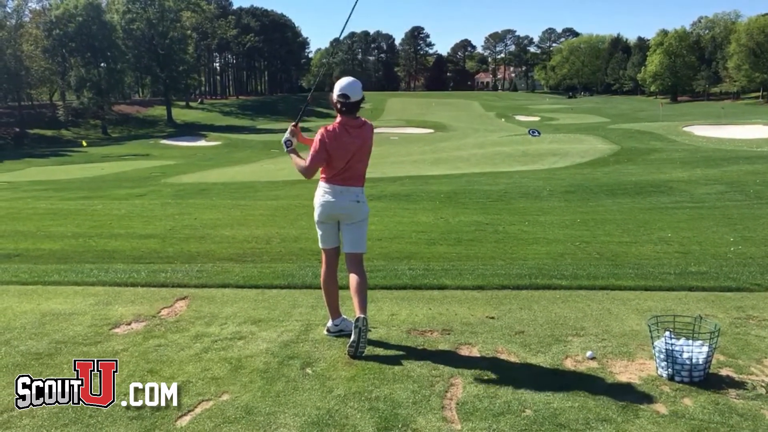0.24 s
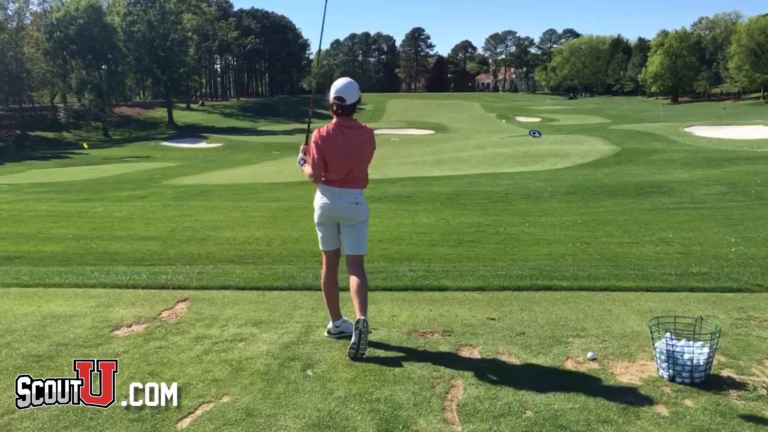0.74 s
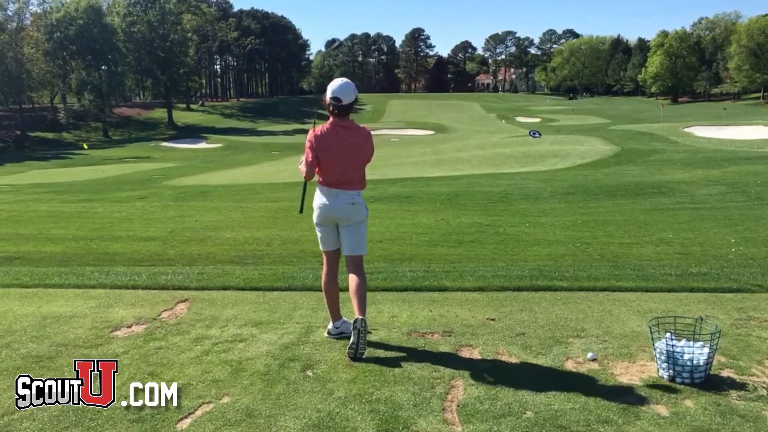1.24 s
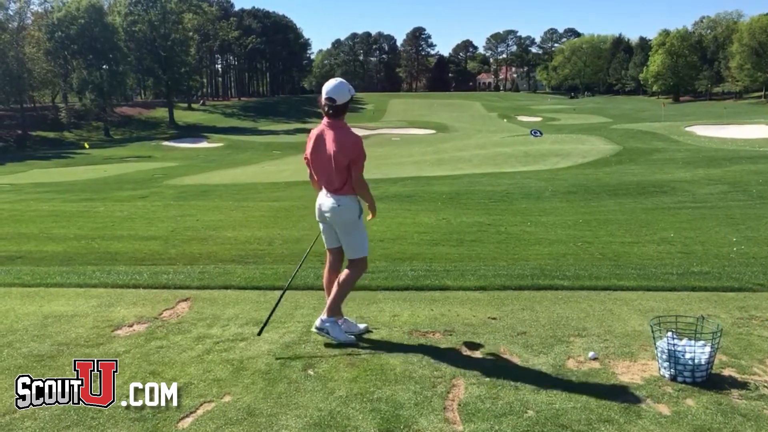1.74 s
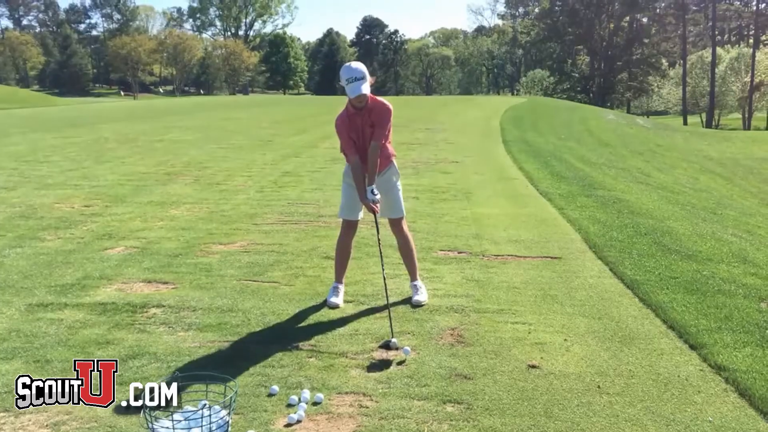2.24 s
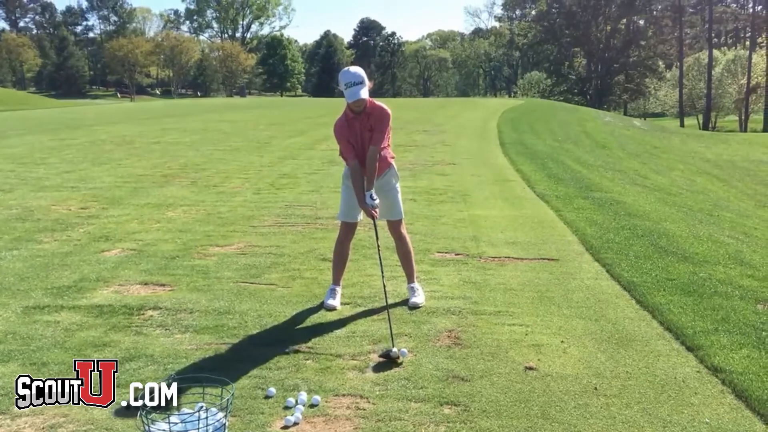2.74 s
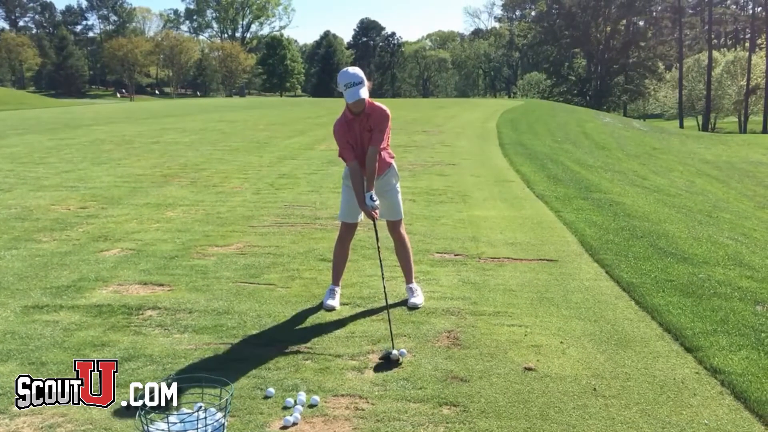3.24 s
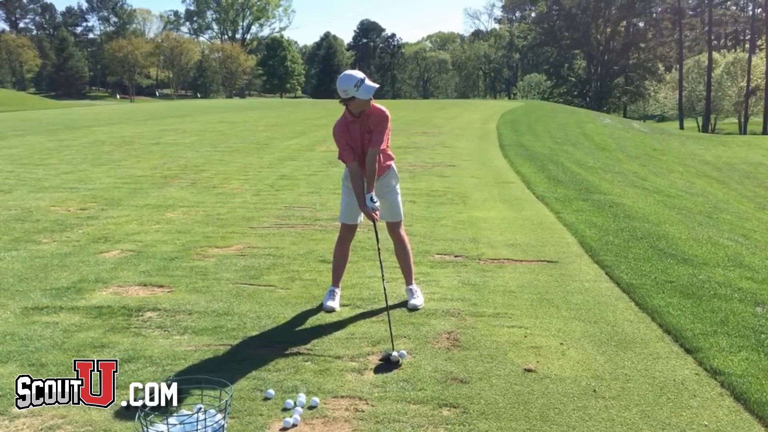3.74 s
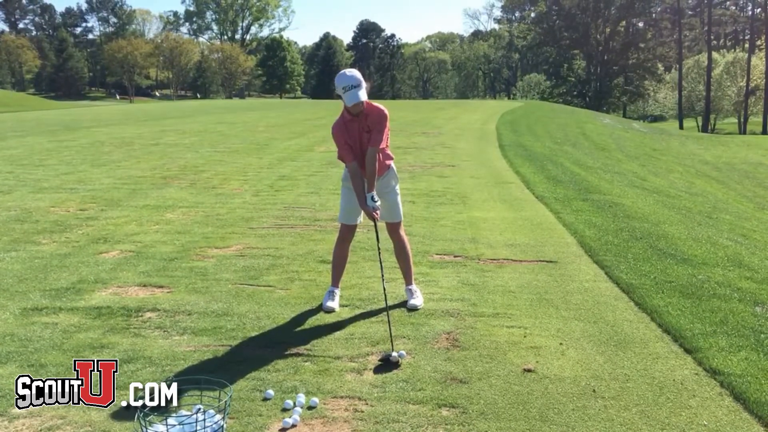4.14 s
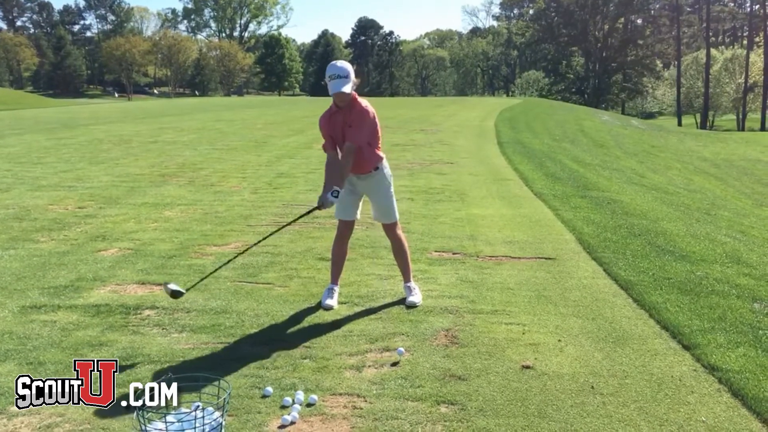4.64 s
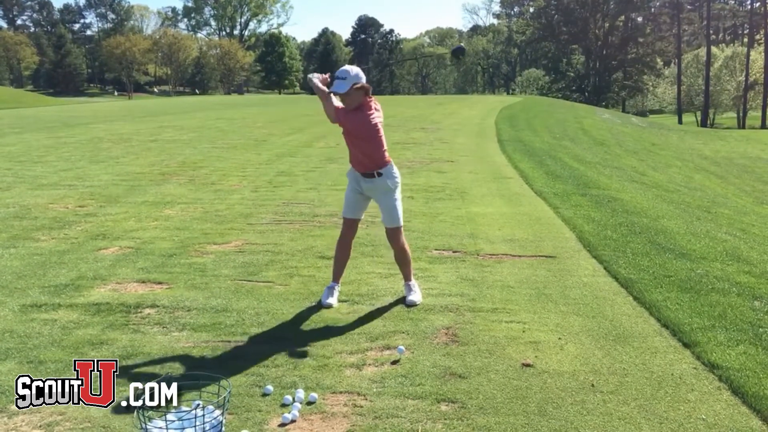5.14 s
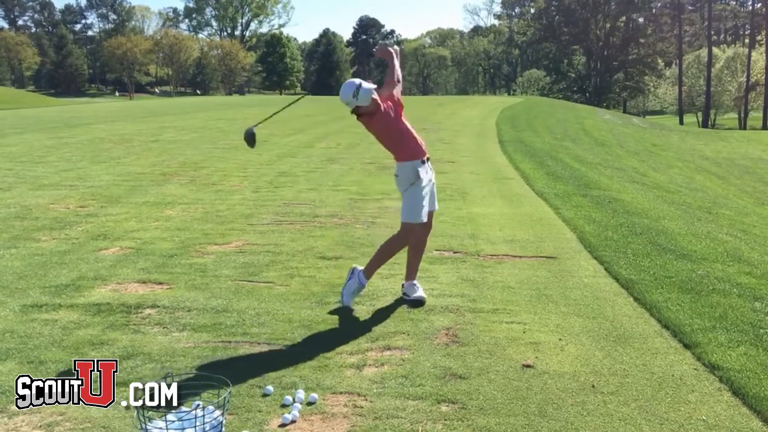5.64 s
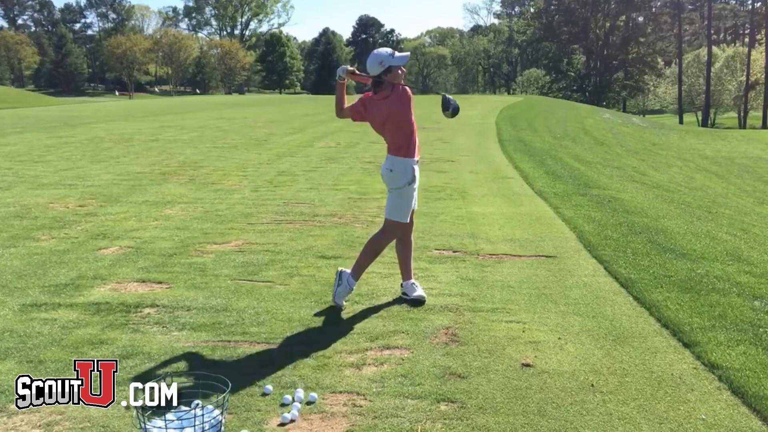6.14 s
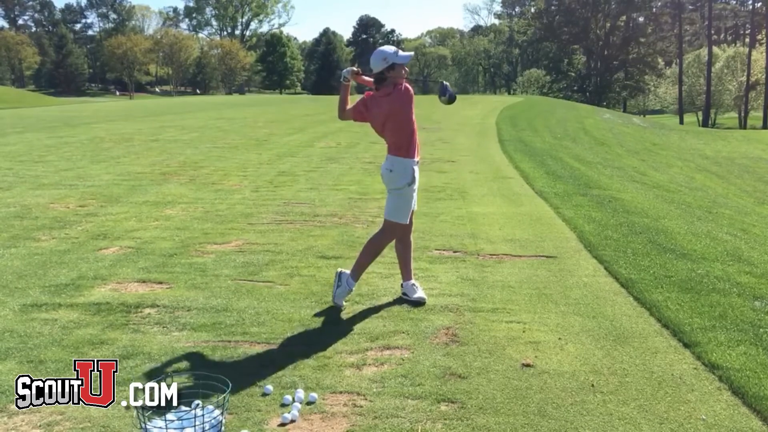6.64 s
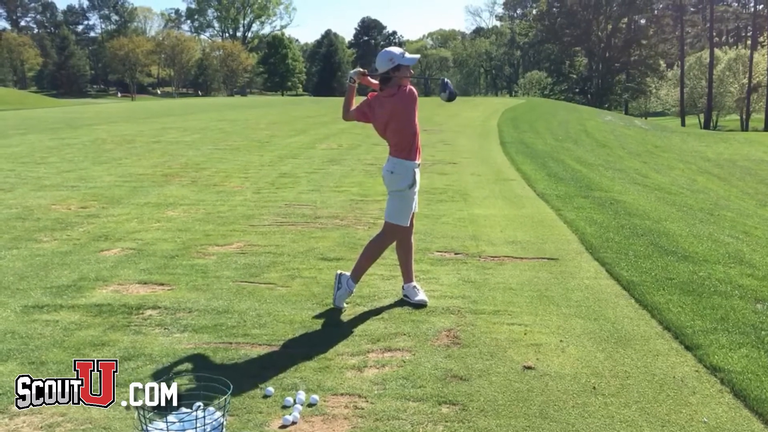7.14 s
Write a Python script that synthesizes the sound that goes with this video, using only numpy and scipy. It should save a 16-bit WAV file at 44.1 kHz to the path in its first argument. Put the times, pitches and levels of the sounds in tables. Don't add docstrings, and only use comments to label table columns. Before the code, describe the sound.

A low engine rumbles faintly, cuts out for an instant, returns louder, then a club swishes and cracks a ball with a bright hollow ring.

```python
import sys
import numpy as np
from scipy import signal
from scipy.fft import rfft, irfft, next_fast_len
from scipy.io import wavfile

SR = 44100
rng = np.random.default_rng(int(sys.argv[2]) if len(sys.argv) > 2 else 0)


def pcm_store(signal):
    levels = np.round(np.clip(np.atleast_2d(signal), -1, 1) * 32767)
    wavfile.write(sys.argv[1], SR, levels.astype(np.int16).T)


def invert_db(x):
    u = np.asarray(x, float) / 20
    return 10 ** u


N = 325899
FIRST_END_S, SECOND_START_S = 2.0963, 2.1441
BLOW_S = 5.533


def rms_one(x):
    return x / np.sqrt(np.mean(x ** 2) + 1e-20)


def by_spot(first, second):
    return np.where(np.arange(N) > SECOND_START_S * SR, second, first)


def in_time(rows):
    s, *columns = np.transpose(rows)
    return [np.interp(np.arange(N) / SR, s, c) for c in columns]


def bumps(rows):
    t = np.arange(0, N + 64, 64) / SR
    bells = sum(height * np.exp(-((t - s) / spread) ** 2) for s, spread, height in rows)
    return np.interp(np.arange(N) / SR, t, bells)


def drift(rate_hz):
    r = np.exp(-80 * np.pi * rate_hz / SR)
    slow = signal.lfilter([1], [1, -2 * r, r * r], rng.standard_normal(N // 40 + 2002))[2000:]
    return np.interp(np.arange(N) / 40, np.arange(len(slow)), rms_one(slow))


def coloured(x, spectrum):
    hz = np.arange(len(x) // 2 + 1) * SR / len(x) + 1
    points = np.array(spectrum)
    gain_db = np.interp(np.log(hz), np.log(points[:, 0]), points[:, 1])
    return irfft(rfft(x) * invert_db(gain_db), len(x))


def noise(spectrum):
    return rms_one(coloured(rng.standard_normal(next_fast_len(N)), spectrum)[:N])


def noise_band(hz, width_hz):
    edges = [hz - width_hz / 2, hz + width_hz / 2]
    band = signal.butter(2, edges, "band", fs=SR, output="sos")
    return rms_one(signal.sosfilt(band, rng.standard_normal(N)))


def add(out, s, hz, db, t60, swell=.0002):
    i = round(s * SR)
    t = np.arange(min(round(t60 * SR * 1.5), N - i)) / SR
    decay = invert_db(db - 60 * np.maximum(t - swell, 0) / t60)
    out[i:i + len(t)] += decay * np.sin(2 * np.pi * hz * t) * np.minimum(t / swell, 1)


def burst(s, rise, hold, t60):
    t = np.arange(N) / SR - s
    fall = invert_db(-60 * np.clip(t - hold, 0, 2 * t60) / t60)
    return np.clip(t / rise, 0, 1) * fall * (t < hold + 2 * t60)


# (frequency [Hz], density [dB per Hz])
WASH_FIRST = [(30, -18.5), (85, -4), (152, -2), (230, -8), (491, -27), (596, -23.5), (1270, -24),
              (2190, -34), (2770, -40.5), (4180, -46.5), (6000, -49.5), (10000, -54), (15500, -60.5)]
WASH_SECOND = [(30, -23.5), (85, -4), (107, -4.5), (221, -1.5), (389, -22.5), (553, -19.5), (756, -22.5),
               (1070, -21), (2740, -29), (4460, -39.5), (6000, -51.5), (9000, -61.5), (15500, -69)]


def wash():
    sway_db = .5 * drift(5)
    return invert_db(by_spot(-46.5, -39) + sway_db) * by_spot(noise(WASH_FIRST), noise(WASH_SECOND))


# (time [s], spread [s], peak [dB])
GUSTS = [(.55, .11, -43), (1.06, .035, -41), (1.45, 0.22, -51.5), (1.88, 0.14, -48), (2.41, 0.066, -29.5),
         (2.9, 0.08, -44), (3.27, .09, -35), (3.62, .1, -43), (3.97, 0.097, -39), (4.25, 0.05, -35),
         (4.42, 0.088, -30), (4.7, 0.072, -42.5), (6.778, 0.055, -46), (6.95, 0.1, -42)]


def wind():
    hz = 46 * (1 + 0.089 * drift(6.9))
    calm = invert_db(by_spot(-58, -50.5) + 4.5 * drift(4))
    push = calm + bumps([(s, spread, invert_db(db)) for s, spread, db in GUSTS])
    return push * np.sin(2 * np.pi * np.cumsum(hz) / SR)


# (time [s], length [s], frequency [Hz], level [dB])
CHIRPS = [
    (.24, .04, 3450, -68),
    (.59, .12, 3900, -78),
    (.63, .14, 2400, -74),
    (.94, .14, 4760, -80),
]


def birds():
    t, out = np.arange(N) / SR, np.zeros(N)
    for s, length, hz, db in CHIRPS:
        shape = np.sin(np.pi * np.clip((t - s) / length, 0, 1)) ** .5
        out += invert_db(db + 3.8 * drift(26)) * shape * np.sin(2 * np.pi * hz * t + 1.6 * drift(40))
    return out


# (time [s], spread [s], change [dB])
FADES = [(.79, 0.029, -12.5), (1.72, 0.013, -2.5), (2.78, 0.049, -7.5), (3.07, 0.037, -8.5),
         (3.39, 0.041, -6.5), (4.15, 0.021, -8.5), (4.32, 0.059, -12), (4.985, 0.024, -11.5),
         (5.31, 0.034, -13), (5.62, 0.094, -3), (6.01, .09, -4), (6.91, 0.081, -4)]
# (time [s], spread [s], change [dB])
BENDS = [
    [(.73, 0.019, 9), (1.49, 0.037, 13), (1.63, 0.034, 10.5), (2.02, 0.044, 4.5), (2.21, .06, -5),
     (2.47, 0.057, -7), (2.67, 0.037, 7.5), (2.95, 0.1, -4), (4.59, 0.066, 6), (4.73, 0.082, -9.5),
     (4.96, .12, -6), (5.2, 0.048, -14), (5.7, 0.038, 5), (6.7, 0.07, -4), (6.91, 0.07, -8.5),
     (7.11, 0.035, -15)],
    [(.45, 0.084, 5.5), (.97, 0.083, 9.5), (2.15, 0.042, -21), (2.38, 0.053, -11), (2.68, 0.031, 6.5),
     (3.2, .035, -24), (4.88, 0.055, 4.5), (5.1, 0.11, 6), (5.25, .04, -10), (5.69, .06, -3.5),
     (3.3, 0.047, -7), (7.11, 0.029, -10), (7.23, .025, -5.5)],
    [(.46, 0.045, 6.5), (1.3, 0.14, 8.5), (1.78, 0.095, 10), (2.4, .06, 4), (2.7, 0.024, 7.5),
     (4.39, 0.069, 7.5), (4.59, 0.057, -17), (5.4, .05, 7), (6.34, .05, -15), (6.78, 0.045, -17),
     (7.11, 0.035, 9.5)],
]


def engine():
    firing_hz = 72.9 * (1 + 0.00609 * drift(1.0))
    turn = 2 * np.pi * np.cumsum(firing_hz) / SR
    first_db, second_db = (-49, -54, -60, -65.5), (-30.5, -34, -42, -53.5)
    own_db = [bumps(rows) for rows in BENDS] + [4 * drift(4)]
    shared_db, out = bumps(FADES), np.zeros(N)
    for k in range(4):
        flutter_db = by_spot(4.5, 3.0) * drift(9.9)
        level_db = by_spot(first_db[k], second_db[k]) + shared_db + own_db[k] + flutter_db
        out += np.sqrt(2) * invert_db(level_db) * np.sin((k + 1) * turn + 1.11 * drift(4.3))
    return out


# (frequency [Hz], width [Hz], level [dB])
WHINES = [(1078.4, 75, -61.5), (1222, 17, -64), (1606, 18, -64.5), (2438, 10, -68.5), (2812, 31, -67.5),
          (3500, 610, -68.5)]


def blades():
    whine = sum(invert_db(db + 0.67 * drift(1.0)) * noise_band(hz, width) for hz, width, db in WHINES)
    return by_spot(0, 1) * whine


def deck_surge():
    peak_s, spread_s = 7.03, .15
    swell = np.exp(-((np.arange(N) / SR - peak_s) / spread_s) ** 2)
    return invert_db(-55) * swell * noise_band(640, 90)


# (time [s], peak [dB], pitch [Hz], t60 [s], scuff [dB])
TICKS = [(.2785, -54, 2170, 0.015, -14), (0.559, -50.5, 1810, 0.02, -15), (.79, -64, 5900, .012, -5),
         (0.809, -47, 1280, 0.017, -13), (0.8358, -50, 3640, 0.013, -30), (2.001, -55, 5600, .012, -12),
         (0.8348, -35, 5370, 0.0033, -26.5), (0.8361, -36, 317, .02, -36),
         (0.8359, -36.5, 704, 0.0057, -36), (0.8351, -42.5, 2020, 0.0061, -13),
         (.838, -57, 4500, 0.064, -20), (1.207, -66, 3230, 0.019, -3), (1.32, -66, 3500, 0.051, -2.5),
         (1.925, -63.5, 3800, 0.078, -3.5), (2.001, -50, 2340, 0.013, -14),
         (2.003, -49.5, 3420, 0.02, -20.5), (2.010, -52, 3250, 0.028, -17), (2.022, -54, 2420, 0.033, -21),
         (2.05, -62, 3330, 0.11, -16.5)]


def ticks():
    out = np.zeros(N)
    grit = noise([(600, -9), (2000, 4.5), (3500, -2.5), (6200, -4.5), (7000, -17.5), (14000, -39)])
    for s, db, hz, t60, scuff_db in TICKS:
        for share in rng.uniform(-1, 1, 3):
            add(out, s, hz * (1 + .06 * share), db - 4, t60, .0005)
        out += invert_db(db + scuff_db) * burst(s, 0.003, 0.82 * t60, 4.9 * t60) * grit
    return out


# (frequency [Hz], density [dB per Hz])
TREE_COLOUR = [(400, -24), (800, 4), (1500, -8), (3000, -3.5), (5000, -9), (8000, -16.5), (14000, -25),
               (16000, -42.5)]


def tree_echo():
    envelope = burst(5.59, rise=0.099, hold=.26, t60=0.56)
    return invert_db(-58.5 + 2.0 * drift(18)) * envelope * noise(TREE_COLOUR)


# (time [s], eddy tone [Hz], tone [dB], hiss [dB])
SWISH = [
    (5.43, 450, -69, -80),
    (5.47, 559.5, -44.5, -70),
    (5.495, 705, -42, -56),
    (5.515, 954.5, -36, -43.5),
    (5.532, 959, -35, -35.5),
    (5.545, 573, -46.5, -57.5),
    (5.58, 559.8, -49, -70),
    (5.62, 407.6, -49, -82.5),
    (5.66, 388, -66.5, -89),
]


def swish():
    hz, level_db, hiss_db = in_time(SWISH)
    turn = 2 * np.pi * np.cumsum(hz) / SR
    eddies = np.zeros(N)
    for ratio, db in ((1, 3.0), (.62, -7.0), (1.6, -9.5)):
        steady = (.6 + .8 * drift(75)) * np.sin(ratio * turn)
        breathy = 0.704 * drift(95) * np.cos(ratio * turn)
        eddies += invert_db(db) * (steady + breathy)
    hiss = noise([(500, -19), (1500, -3.5), (4000, -5.0), (8000, -4.0), (15000, -18.5)])
    return (level_db > -69) * (invert_db(level_db) * eddies + invert_db(hiss_db) * hiss)


# (time [s], frequency [Hz], level [dB], swell [s], t60 [s])
RINGS = [(5.535, 522, -29, 0.0087, 0.037), (5.534, 670, -30.5, .008, 0.039),
         (5.55, 2140, -36.5, 0.013, 0.15), (5.552, 2095, -45, 0.019, 0.21), (5.553, 4060, -36, .008, .11),
         (5.553, 4210, -38, .008, .08), (5.55, 4450, -35, .01, 0.087), (5.555, 4960, -40, 0.012, 0.051),
         (5.565, 566, -46, 0.013, 0.1), (5.602, 428, -44.5, 0.023, 0.11)]


def turf_and_tee():
    out = np.zeros(N)
    for s, hz, db, swell, t60 in RINGS:
        add(out, s, hz, db, t60, swell)
    return out


# (frequency [Hz], density [dB per Hz])
SCATTER = [(880, -43), (1500, -5.5), (1860, -20.5), (2120, -16), (2320, -23), (3990, -7), (7580, -10.5),
           (8200, -17), (12700, -20.5), (15900, -33)]


def scatter():
    tail = invert_db(-25) * burst(BLOW_S, 0.011, 0.012, .09)
    bank = invert_db(-35.5) * burst(BLOW_S + 0.02, .004, .016, 0.044)
    return (tail + bank) * noise(SCATTER)


# (frequency [Hz], density [dB per Hz])
CRACK = [(530, -39.5), (900, 1.5), (1550, -3.5), (2410, -28), (4500, 10), (5080, -19.5), (7370, -8.5),
         (8110, -12), (14600, -13.5), (15900, -50.5)]


def crack():
    spikes = invert_db(5 * rng.exponential(1, N).clip(0, 3))
    splinters = rms_one(spikes * noise(CRACK))
    colour = [(700, -25.5), (1200, -1.5), (15000, 1), (16000, -24.5)]
    return invert_db(-23) * burst(BLOW_S, .0002, .011, 0.012) * coloured(splinters, colour)


# (time [s], level [dB])
KNOCKS = [
    (5.533, -3.5),
    (5.5369, -21),
    (5.5392, -15.5),
]
# (frequency [Hz], level [dB], t60 [s])
BALL = [(1100, -24, .012), (1330, -10.5, 0.018), (1507, -11.5, .016), (1773, -13.5, 0.013),
        (1860, -23.5, 0.014)]


def ball():
    out = np.zeros(N)
    for s, knock_db in KNOCKS:
        for hz, db, t60 in BALL:
            add(out, s, hz, knock_db + db + 2 * rng.standard_normal(), t60)
    return out


HEAD_HZ = [3530, 4055, 4135, 4535, 4795, 5090, 5490, 5870, 6150, 6640, 6840, 7135, 7535, 8560, 10000, 11200,
           11850, 12600, 13710]
# (level [dB], swell [s], t60 [s])
HEAD = [(-19, 0.001394, 0.033), (-19.5, .007, 0.05), (-19, 0.00203, 0.029), (-13.5, 0.0075, 0.025),
        (-22, 0.0032, 0.034), (-30, .002, 0.025), (-19.5, 0.00071, .03), (-18, 0.0012, 0.027),
        (-26.5, 0.0041, 0.054), (-21, 0.0044, 0.025), (-20.5, 0.0005, 0.067), (-16, 0.000685, 0.023),
        (-18.5, 0.0069, 0.029), (-26.5, .004, 0.026), (-26, 0.0011, 0.022), (-25.5, 0.0029, 0.013),
        (-27.5, 0.0019, 0.02), (-28, 0.0013, 0.023), (-35.5, 0.000978, .02)]


def head():
    out = np.zeros(N)
    for hz, (db, swell, t60) in zip(HEAD_HZ, HEAD):
        add(out, BLOW_S, hz, db, t60, swell)
    return out


def strike():
    no_bass = signal.butter(3, 800, "high", fs=SR, output="sos")
    body = invert_db(2) * signal.sosfilt(no_bass, head() + ball())
    return body + crack() + scatter() + turf_and_tee()


def gain_control():
    duck_db, attack_s, hold_s, release_s = -2.5, 0.0026, 0.19, 0.071
    t = np.arange(N) / SR - 5.5435
    return invert_db(duck_db * np.clip(t / attack_s, 0, 1) * np.clip(1 - (t - hold_s) / release_s, 0, 1))


# (frequency [Hz], side minus mid [dB])
SIDE_DB = [(100, -48), (250, -31), (500, -23), (4000, -23), (12000, -12)]


def scene():
    background = wash() + wind() + birds() + engine() + blades() + deck_surge()
    golf = ticks() + tree_echo() + swish() + strike()
    mid = (background + golf) * gain_control()
    side = coloured(np.roll(mid, 23), SIDE_DB) * by_spot(0, 1)
    return np.array([mid + side, mid - side])


# (frequency [Hz], step [dB])
MID_STEP = [(250, -50.5), (1000, -57), (3500, -42.5), (4650, -31.5), (4950, -21.5), (5800, -25.5),
            (7000, -22.5), (10000, -26.5), (16000, -31)]
SIDE_STEP = [(100, 6), (230, -4), (400, -16), (1000, -16), (2000, -18), (4500, -24), (16000, -30)]


def starve(x):
    hop, lead = 1024, 2048 - 171
    n = np.arange(2 * hop) + .5
    window = np.sqrt(2 / hop) * np.sin(np.pi * n / 2 / hop)
    basis = window[:, None] * np.cos(np.pi / hop * np.outer(n + hop / 2, n[:hop]))
    count = N // hop + 4
    ends = (lead, (count + 1) * hop - N - lead)
    padded = np.pad([x[0] + x[1], x[0] - x[1]], ((0, 0), ends), "reflect").reshape(2, -1, hop) / 2
    lines = np.concatenate([padded[:, :-1], padded[:, 1:]], axis=2) @ basis

    spare_db = rng.standard_normal((2, count)) * [[3.0], [4.0]]
    spare_db += 3.5 * (np.arange(count) * hop < FIRST_END_S * SR + lead)
    loud_db = 10 * np.log10(np.mean(lines[0] ** 2, axis=1) + 1e-12) + spare_db
    log_hz = np.log(n[:hop] * SR / 2 / hop)
    curves = [np.transpose(points) for points in (MID_STEP, SIDE_STEP)]
    step_db = np.array([np.interp(log_hz, np.log(hz), db) for hz, db in curves])
    by_band_db = np.repeat(2.2 * rng.standard_normal((2, count, hop // 16)), 16, axis=2)
    step = invert_db(loud_db[:, :, None] + step_db[:, None] + by_band_db)

    rounded = np.sign(lines) * np.floor(abs(lines) / step + .4) * step
    back = rounded @ basis.T
    out = np.zeros_like(padded)
    out[:, :-1] += back[:, :, :hop]
    out[:, 1:] += back[:, :, hop:]
    mid, side = out.reshape(2, -1)[:, lead:lead + N]
    return np.array([mid + side, mid - side])


def top_cut(x):
    return signal.sosfilt(signal.butter(12, 16050, fs=SR, output="sos"), x)


def record(dry):
    t = np.arange(N) / SR
    limited = 1.181 * np.tanh(dry / 1.191)
    heard = (t < FIRST_END_S) + np.clip((t - SECOND_START_S) / .0006, 0, 1)
    gap_hiss = invert_db(-69.5) * noise(WASH_SECOND) * (heard == 0)
    click = invert_db(-43) * np.exp(np.minimum(t - FIRST_END_S, 0) / .002) * (t < FIRST_END_S)
    mix = starve(limited) * heard + gap_hiss - click
    return top_cut(mix)


dry = scene()
out = record(dry)
pcm_store(out)
```